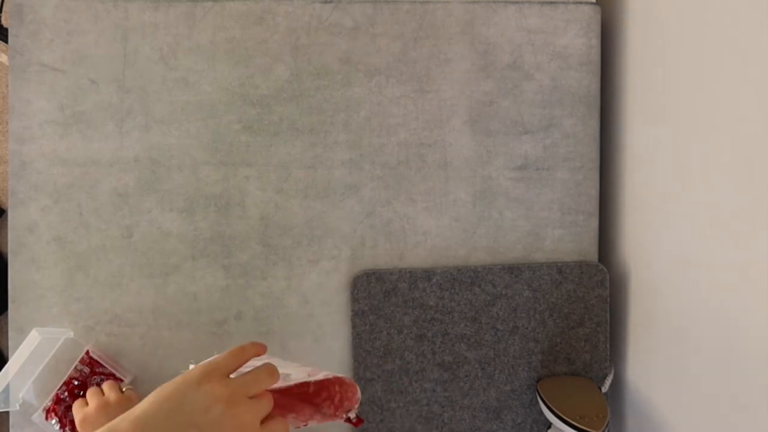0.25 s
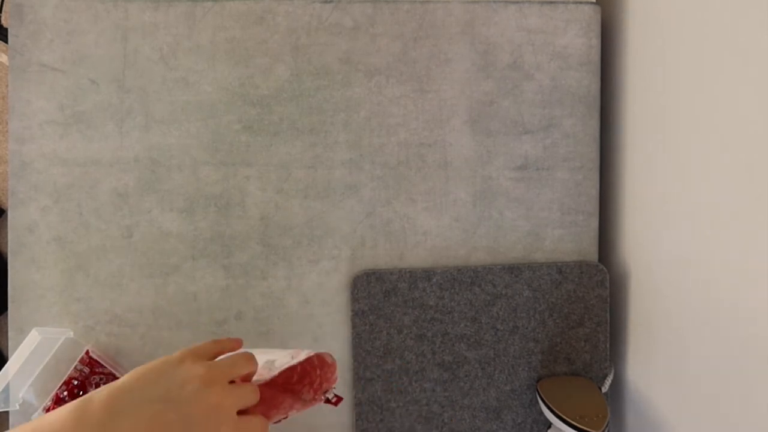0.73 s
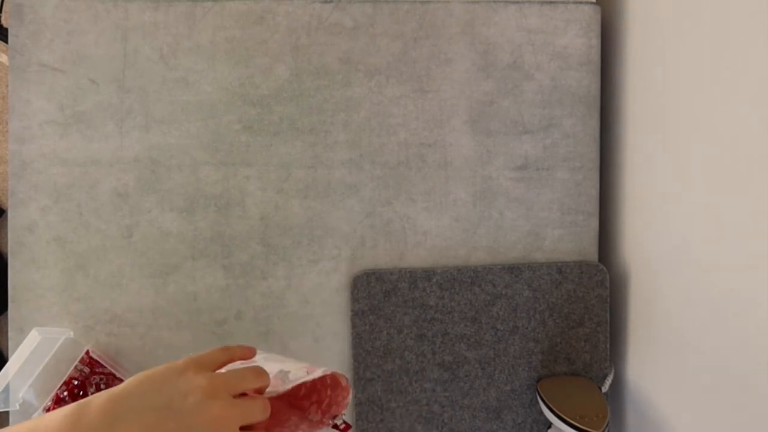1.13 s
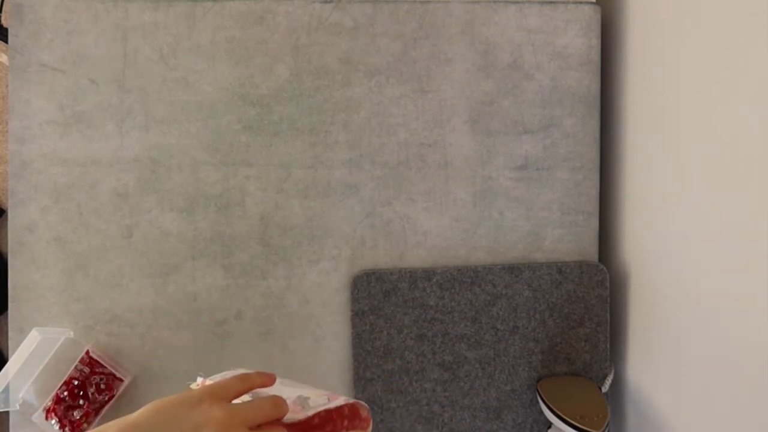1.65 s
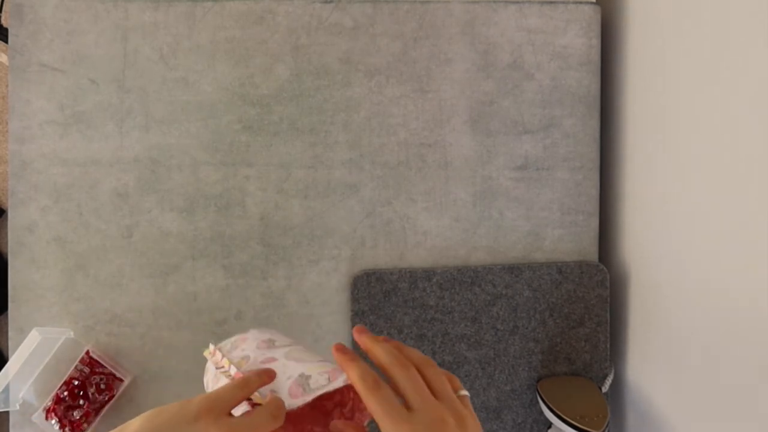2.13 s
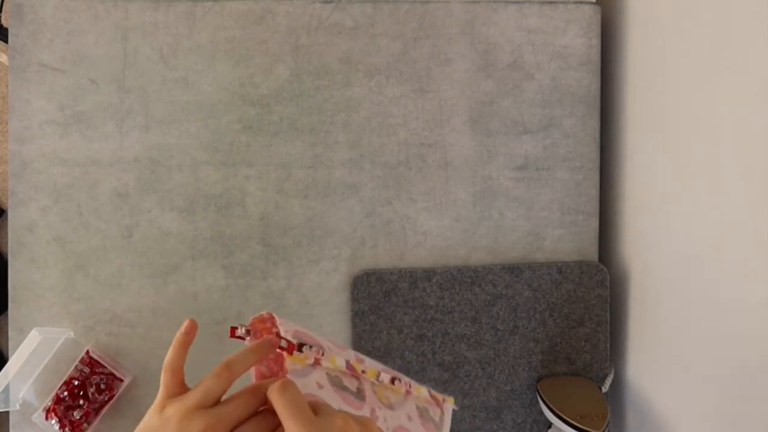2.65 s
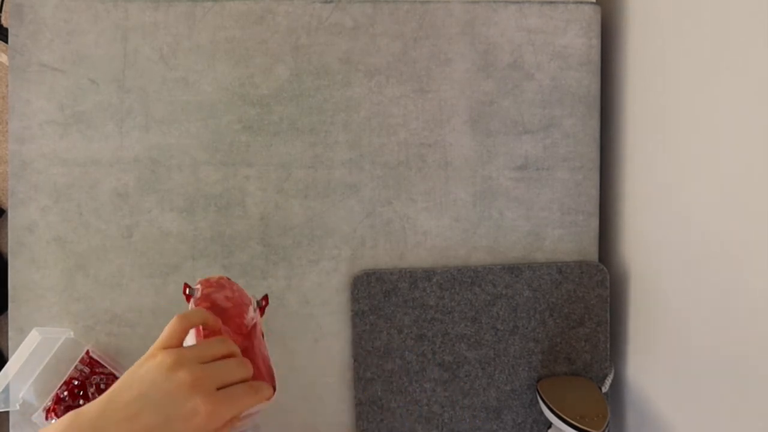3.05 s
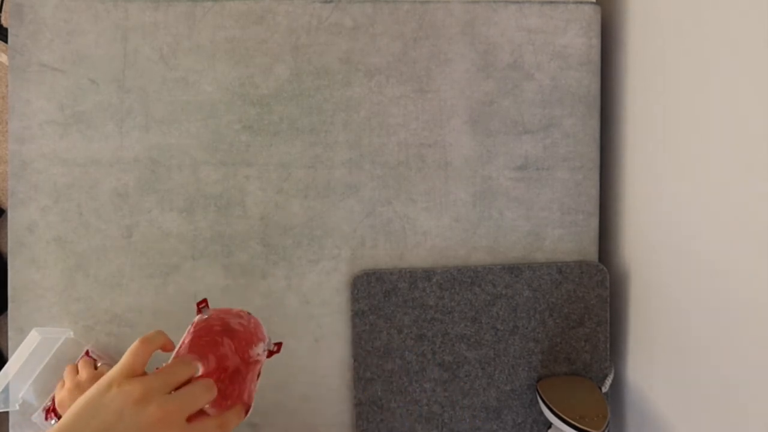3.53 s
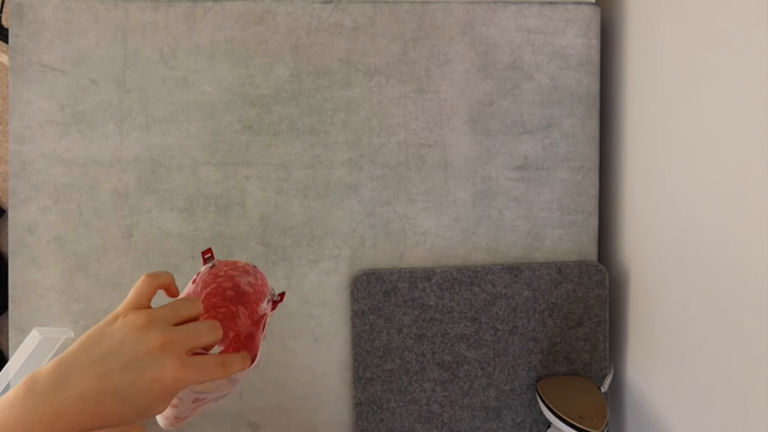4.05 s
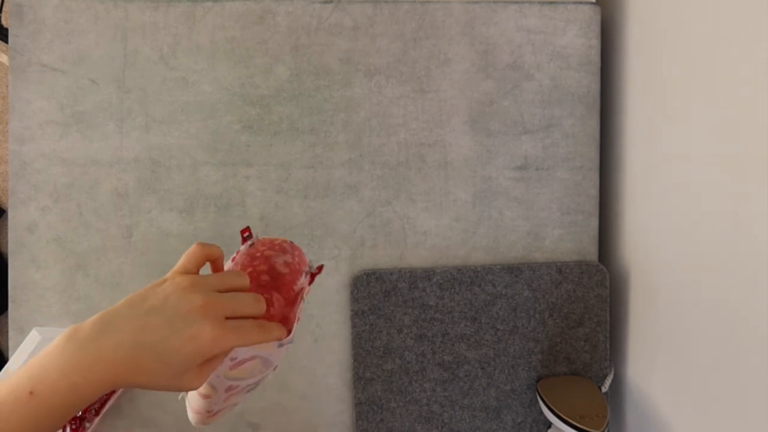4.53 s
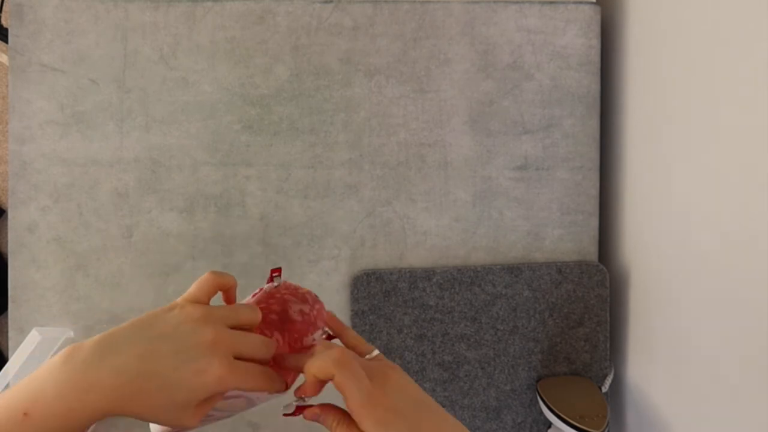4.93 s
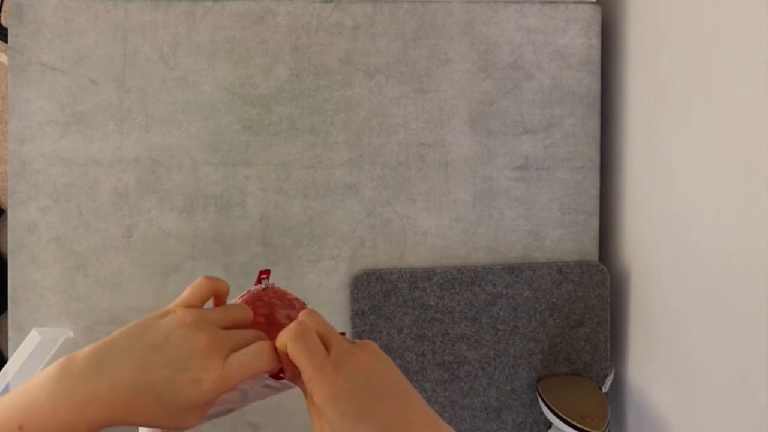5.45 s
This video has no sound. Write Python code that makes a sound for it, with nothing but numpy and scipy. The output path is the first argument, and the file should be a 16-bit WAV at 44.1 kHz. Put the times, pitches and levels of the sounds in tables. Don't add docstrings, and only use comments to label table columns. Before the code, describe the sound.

A short, sharp rattle of hard little plastic clips in a tub comes almost at once, then several seconds of barely audible cloth rubbing and tiny clicks. A longer, uneven rummage through the clips follows, with bright knocks, before a last faint tick. Close, mostly dry sound, centred with wide treble, over gentle room hum.

```python
import sys
import numpy as np
from scipy import signal
from scipy.fft import rfft, irfft, next_fast_len
from scipy.io import wavfile
from scipy.ndimage import uniform_filter1d

SR = 44100
rng = np.random.default_rng(int(sys.argv[2]) if len(sys.argv) > 2 else 0)


def wav_out(sig):
    wavfile.write(sys.argv[1], SR, np.round(np.clip(np.atleast_2d(sig).T, -1, 1) * 32767).astype(np.int16))


def makeup_ratio(level_db):
    decades = np.asarray(level_db, float) / 20
    return 10 ** decades


N = 250929

# entry in seconds, exit in seconds.
DIG_SPANS = [
    (0.33, 0.69),
    (3.43, 4.27),
]
# touch in seconds, crest in seconds, rattle at the crest in dB.
FINGER_STROKES = [(0.372, 0.385, -40), (0.392, 0.445, -24), (0.47, 0.53, -34.5), (0.551, 0.566, -25),
                  (0.582, 0.614, -31), (3.449, 3.449, -38), (3.504, 3.556, -40.5), (3.608, 3.615, -30),
                  (3.661, 3.683, -27), (3.699, 3.734, -19.5), (3.752, 3.81, -17.5), (3.83, 3.883, -30),
                  (3.91, 3.953, -29), (3.979, 3.993, -23.5), (4.028, 4.042, -37), (4.058, 4.066, -26),
                  (4.095, 4.106, -24), (4.13, 4.192, -36)]
# start in seconds, peak in dB, ring in Hz, treble in dB re peak.
HARD_KNOCKS = [(0.387, -14.5, 2290, -31), (0.4122, -12.5, 2540, -16), (0.4233, -7, 2394, -16),
               (0.503, -20, 2440, -13), (0.547, -20, 2780, -27), (0.5606, -12, 1344, -36),
               (0.5961, -24, 2130, -15), (0.6244, -13.5, 1920, -27), (3.4484, -37, 1010, -20),
               (3.5125, -35, 2780, -23), (3.5493, -22.5, 1990, -20), (3.57, -24, 2010, -27),
               (3.6028, -17.5, 1830, -23), (3.6514, -21.5, 2120, -8.5), (3.6647, -12.5, 2870, -14.5),
               (3.7163, -10.5, 2220, -8.5), (3.7448, -12, 2070, -20), (3.7663, -6.5, 2870, -13),
               (3.7914, -9, 2120, -18), (3.8146, -14, 2160, 0.5), (3.8367, -9, 2320, -9),
               (3.8574, -11, 2320, -17), (3.9836, -8.5, 2340, -14), (3.9994, -15, 1940, -23),
               (4.0174, -12.5, 1760, -25), (4.0695, -9.5, 2350, -31), (4.1001, -11, 2450, -31),
               (4.1062, -8, 2394, -35), (4.1794, -20, 2180, -11), (4.2186, -24, 2830, -24)]
# frequency in Hz, density in dB per Hz.
HEAP_MID_SPECTRUM = [(82, -39), (140, 2.5), (178, -6.5), (505, -4), (665, -11.5), (844, 0.5), (1050, -13.5),
                     (1260, -3), (2360, 0), (2990, -7.5), (4240, -21), (8350, -29), (9150, -26.5),
                     (11200, -35.5), (14600, -71), (22000, -120)]
# frequency in Hz, density in dB per Hz.
HEAP_SIDE_SPECTRUM = [(65, -49), (110, -27), (261, -17.5), (419, -13), (455, -19), (1040, -37), (1100, -20),
                      (2000, -6), (2360, 2), (3410, -4), (5480, -10), (9350, -8), (15000, -21.5)]
# frequency in Hz, level in dB, decay time T60 in seconds.
BODY_MODES = [(182, -5.5, 0.2), (270, -6, 0.073), (848, -11, 0.13), (1292, -4.5, 0.058), (1817, -6, 0.14),
              (2193, -5.5, 0.14), (2394, -17, 0.047), (2964, -0.5, 0.043), (3300, -4.5, .03),
              (3463, -11.5, 0.12), (4700, -16.5, 0.043), (9200, -22.5, 0.044), (10200, -38.5, .03)]
# start in seconds, peak
# in dB, ring in Hz, T60 in seconds.
HEAP_PINGS = [(.338, -39, 190, 0.19), (.385, -28, 182, 0.18), (3.992, -27, 185, 0.21),
              (3.447, -42, 790, 0.025), (4.102, -44, 11600, .035), (4.102, -43, 12400, .035),
              (4.103, -43, 13300, .035), (.413, -40, 8900, .04), (.578, -46, 9400, .04),
              (.597, -36.5, 8870, .05), (3.546, -56, 9200, 0.029), (3.605, -38.5, 4580, 0.13),
              (3.604, -42, 9200, 0.1), (3.665, -38, 5430, .04), (4.101, -35, 4820, 0.055),
              (4.177, -41, 9160, 0.021), (4.203, -42, 9100, 0.034)]
# start in seconds, peak in dB, ring in Hz, T60 in seconds.
CLIP_SNAPS = [(1.813, -41, 1950, 0.02), (1.813, -50, 1510, .03), (2.266, -44, 4230, 0.052),
              (2.266, -46, 4900, .05), (2.267, -42, 2370, 0.026), (2.268, -45, 4550, 0.052),
              (2.281, -56, 4580, .05), (2.295, -48, 4390, .05), (2.300, -56, 5000, .04),
              (2.318, -57, 4700, 0.037), (2.334, -56, 4230, 0.036), (4.8688, -40.5, 2340, 0.04),
              (4.8688, -47, 2000, .015), (4.8688, -42, 1600, .015), (4.8688, -47, 3100, 0.024)]
# time in seconds, rustle in dB.
HAND_ACTIVITY = [(0.0, -61), (0.06, -59), (0.22, -57.5), (0.8, -58.5), (0.95, -61.5), (1.5, -68),
                 (1.85, -66.5), (2.23, -61), (2.46, -61), (2.55, -67.5), (2.85, -63.5), (2.92, -64),
                 (3.17, -64), (3.4, -62), (4.4, -66), (4.5, -68), (5.3, -65.5), (5.69, -66.5)]
# frequency in Hz, density in dB per Hz.
AIR_MID_SPECTRUM = [(8.8, -28), (15, -5.5), (43, -4.5), (64, -5), (125, -1.5), (326, -7.5), (355, -9.5),
                    (423, -7.5), (475, -10.5), (549, -11.5), (801, -15.5), (981, -14.5), (4440, -22),
                    (14200, -38.5), (15500, -45)]
# frequency in Hz, density in dB per Hz.
AIR_SIDE_SPECTRUM = [(8.8, -59), (15, -29), (38, -19.5), (144, -1.5), (290, -0.5), (366, -1), (399, -0.5),
                     (692, -9.5), (1170, -10), (1310, -11), (7270, -27.5), (13400, -39), (15500, -36)]
# frequency in Hz, T60 in seconds.
ROOM_DECAY = [(100, 0.21), (2000, 0.36), (5000, 0.41), (15000, 0.043)]
# channel (0 mid, 1 side), low edge in Hz, high edge in Hz,
# threshold in dB under the mid level.
MASKED_BANDS = [(0, 10700, 11300, 41), (0, 11300, 12000, 41), (0, 12000, 12700, 43), (0, 12700, 14000, 41),
                (0, 14000, 16000, 42), (1, 800, 1200, 33), (1, 1200, 1600, 32), (1, 1600, 2000, 30),
                (1, 2000, 2400, 27), (1, 15000, 16000, 44)]

SWELL_DB_PER_S, FADE_DB_PER_S, BITE_DB_PER_S = 189, 245, 1004
THUMP_DB, THUMP_FOLLOWS = -29.5, 0.59
TREBLE_DB, TREBLE_FOLLOWS = -30, 0.96
CONTACTS_PER_S, HEAP_SIDE_DB = 1500, -15
RUMBLE_DB, RUMBLE_FOLLOWS = -64, 1.32
SWAY_DB, SWAY_FOLLOWS = -72, 2.1
AIR_DB, AIR_SIDE_DB, ROOM_DB = -52.5, -54.5, -18.5


def pushing():
    clock, power = np.arange(N) / SR, 1e-12
    for touch_s, crest_s, crest_db in FINGER_STROKES:
        slope = np.where(clock < crest_s, SWELL_DB_PER_S, FADE_DB_PER_S)
        bite_db = BITE_DB_PER_S * np.maximum(touch_s - clock, 0)
        power = power + makeup_ratio(2 * (crest_db - slope * np.abs(clock - crest_s) - bite_db))
    return 10 * np.log10(power)


def stirring():
    rattle_db = pushing()
    swing_db = rattle_db + 30
    s, peak_db, _, knock_treble_db = np.transpose(HARD_KNOCKS)
    flurries = np.zeros((2, N))
    flurries[:, (s * SR).astype(int)] = makeup_ratio([peak_db - 11, peak_db + knock_treble_db + 4])
    flurries = signal.lfilter([1], [1, -makeup_ratio(-60 / (0.06 * SR))], flurries + 1e-18)
    flurries = signal.lfilter([0.015], [1, -0.985], flurries)
    bass = makeup_ratio(THUMP_DB + THUMP_FOLLOWS * swing_db)
    middle = np.hypot(makeup_ratio(rattle_db - 2.5), flurries[0])
    treble = np.hypot(makeup_ratio(TREBLE_DB + TREBLE_FOLLOWS * swing_db), flurries[1])
    return bass, middle, treble


def contacts(per_s, spread_db):
    sizes = makeup_ratio(spread_db * np.minimum(rng.exponential(1, N), 4))
    clicks = rms_one(sizes * (rng.random(N) < per_s / SR))
    local_power = np.abs(uniform_filter1d(clicks ** 2, size=900))
    return rms_one(clicks / np.sqrt(local_power + 0.023))


def heap(forces, spectrum, cycles, low_cut_hz):
    heavy = contacts(CONTACTS_PER_S, spread_db=3.0)
    luck = rms_one(rng.standard_normal(N) * makeup_ratio(rng.normal(0, 6.6, N)))
    fine = 0.38 * heavy + 0.95 * contacts(5000, spread_db=4.0)
    clock = np.arange(N) / SR
    live = np.any([(clock > start - 0.05) & (clock < end + 0.3) for start, end in DIG_SPANS], axis=0)
    luck = luck[live]
    bass, middle, treble = forces
    drives = [(bass * heavy)[live], (middle * heavy)[live], (treble * fine)[live]]

    pitches = np.linspace(150 ** 0.3, 15000 ** 0.3, 70) ** (1 / 0.3)
    levels = at_hz(spectrum, pitches) + 10 * np.log10(np.gradient(pitches))
    levels -= 10 * np.log10(np.sum(makeup_ratio(2 * levels)))
    rings = [(hz, db, cycles / hz + 0.014) for hz, db in zip(pitches, levels)]
    for hz, db, t60 in BODY_MODES:
        tilt_db = at_hz(spectrum, hz) - at_hz(HEAP_MID_SPECTRUM, hz)
        rings.append((hz, db + tilt_db - 12, t60))

    out = np.zeros(N)
    for k, (hz, db, t60) in enumerate(rings):
        drive = drives[int(hz > 1100) + int(hz > 3700)]
        chance = np.roll(luck, 97 * k)
        out[live] += makeup_ratio(db) * steady(drive * chance, hz, t60)
    return signal.sosfilt(signal.butter(4, low_cut_hz, "high", fs=SR, output="sos"), out)


def ring(clicks, hz, t60):
    r, w = makeup_ratio(-60 / (t60 * SR)), 2 * np.pi * hz / SR
    return signal.lfilter([0, np.sin(w)], [1, -2 * r * np.cos(w), r * r], clicks + 1e-18)


def steady(clicks, hz, t60):
    return ring(clicks, hz, t60) * np.sqrt(4 * np.log(1000) / (t60 * SR))


def lone_rings(rows, t60s, crack_db, rough):
    length = 8000
    out, span = np.zeros(N + length), np.arange(length) / SR
    for (s, peak_db, hz), t60 in zip(rows, t60s):
        chatter = 1 + rough * rms_one(uniform_filter1d(rng.standard_normal(length), size=30))
        decay = makeup_ratio(-60 * span / np.clip(t60, 0.005, 0.15))
        tone = chatter * np.sin(2 * np.pi * hz * span) * decay
        crack = makeup_ratio(crack_db) * rng.standard_normal(length) * makeup_ratio(-60 * span / 0.0097)
        start = round(s * SR)
        out[start:start + length] += makeup_ratio(peak_db) * (tone + crack) / (1 + rough)
    return out[:N]


def cloth():
    s, db = np.transpose(HAND_ACTIVITY)
    hands_db = np.interp(np.arange(N) / SR, s, db)
    swing_db = hands_db + 64
    rustle_db = hands_db + 0.8 * drift(per_s=12)
    rumble_db = RUMBLE_DB + RUMBLE_FOLLOWS * swing_db + 1.96 * drift(per_s=9.8)
    sway_db = SWAY_DB + SWAY_FOLLOWS * swing_db + 3 * drift(per_s=10)
    grains = np.array([contacts(2500, spread_db=0.0) * rng.standard_normal(N) for _ in range(2)])
    rustle = band_noise(grains, 1500, 2700) * makeup_ratio([[0], [-3]])
    rumble = band_noise(rng.standard_normal((2, N)), 200, 800)
    sway = band_noise(rng.standard_normal(N), 28, 44) * [[1], [0]]
    return makeup_ratio(rustle_db - 4) * rustle + makeup_ratio(rumble_db) * rumble + makeup_ratio(sway_db) * sway


def band_noise(x, low_hz, high_hz):
    return rms_one(signal.sosfilt(signal.butter(2, [low_hz, high_hz], "band", fs=SR, output="sos"), x))


def drift(per_s):
    knots = rng.standard_normal(400)
    return np.interp(np.arange(N) / SR * per_s, np.arange(len(knots)), knots)


def room(x):
    size = next_fast_len(N + SR)
    hz = np.maximum(np.arange(size // 2 + 1) * SR / size, 1)
    t60, out = at_hz(ROOM_DECAY, hz), []
    for voice, lags in zip(x, rng.uniform(0.008, 0.04, (2, 10))):
        rounds = [makeup_ratio(-60 * lag / t60) * np.exp(-2j * np.pi * hz * lag) for lag in lags]
        echo = sum((-1) ** k * g / (1 - g) for k, g in enumerate(rounds))
        out.append(irfft(rfft(voice, size) * echo, size)[:N])
    return np.array(out)


def room_air():
    mid = makeup_ratio(AIR_DB - 0.5) * coloured(AIR_MID_SPECTRUM)
    side = makeup_ratio(AIR_SIDE_DB) * coloured(AIR_SIDE_SPECTRUM)
    return np.array([mid, side])


def coloured(spectrum):
    size = next_fast_len(N)
    hz = np.maximum(np.arange(size // 2 + 1) * SR / size, 1)
    return rms_one(irfft(rfft(rng.standard_normal(size)) * makeup_ratio(at_hz(spectrum, hz)), size)[:N])


def at_hz(points, hz):
    table = np.array(points)
    return np.interp(np.log(hz), np.log(table[:, 0]), table[:, 1])


def rms_one(x):
    return x / np.sqrt(np.mean(x ** 2) + 1e-20)


def scene():
    forces = stirring()
    mid = heap(forces, HEAP_MID_SPECTRUM, cycles=22.0, low_cut_hz=159)
    side = heap(forces, HEAP_SIDE_SPECTRUM, cycles=7.4, low_cut_hz=120)
    knocks, pings, ticks = np.array(HARD_KNOCKS), np.array(HEAP_PINGS), np.array(CLIP_SNAPS)
    mid += makeup_ratio(-7.5) * lone_rings(knocks[:, :3], np.full(len(knocks), 0.04), crack_db=-34, rough=0.36)
    mid = signal.sosfilt(signal.butter(6, 12200, fs=SR, output="sos"), mid)
    mid += lone_rings(pings[:, :3], pings[:, 3], crack_db=-30, rough=0.31)
    snaps = lone_rings(ticks[:, :3], ticks[:, 3], crack_db=-24, rough=0.45)
    near = np.array([mid + snaps, makeup_ratio(HEAP_SIDE_DB) * side + makeup_ratio(-14) * snaps])
    mid, side = near + makeup_ratio(ROOM_DB) * room(near) + cloth() + room_air()
    return np.array([mid + side, mid - side])


def roll_off(x):
    return signal.sosfilt(signal.butter(12, 15620, fs=SR, output="sos"), x)


def record(dry):
    pair = np.array([dry[0] + dry[1], dry[0] - dry[1]]) / 2
    size = next_fast_len(N)
    hz = np.arange(size // 2 + 1) * SR / size
    frames = (np.arange(N) + 647) // 1024
    spectra, loud = rfft(pair, size), np.bincount(frames, pair[0] ** 2)
    hidden = False
    for channel, low, high, under_db in MASKED_BANDS:
        band = irfft(spectra[channel] * (hz >= low) * (hz < high), size)[:N]
        below = hidden & (channel == 0)
        hidden = below | (np.bincount(frames, band ** 2) < loud * makeup_ratio(-2 * under_db))
        pair[channel] -= band * uniform_filter1d(hidden[frames] * 1.0, size=512)
    mix = np.array([pair[0] + pair[1], pair[0] - pair[1]])
    return roll_off(mix)


dry = scene()
out = record(dry)
wav_out(out)
```